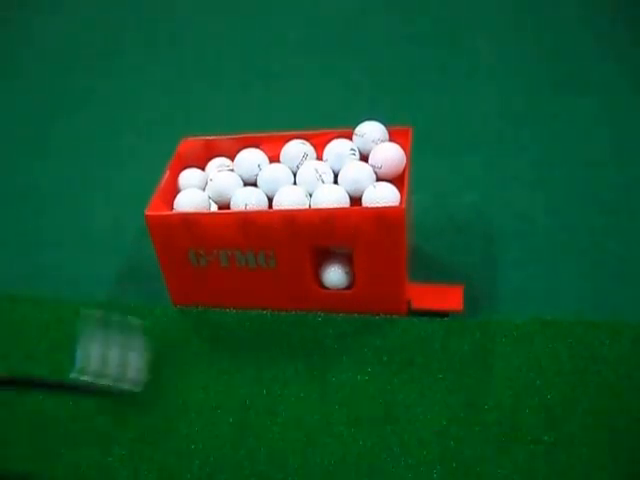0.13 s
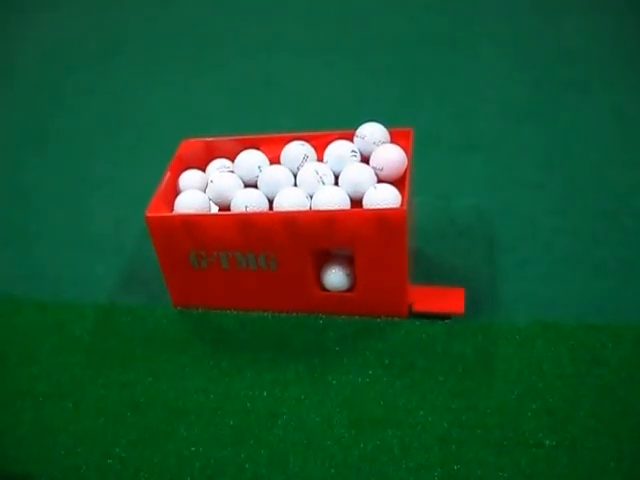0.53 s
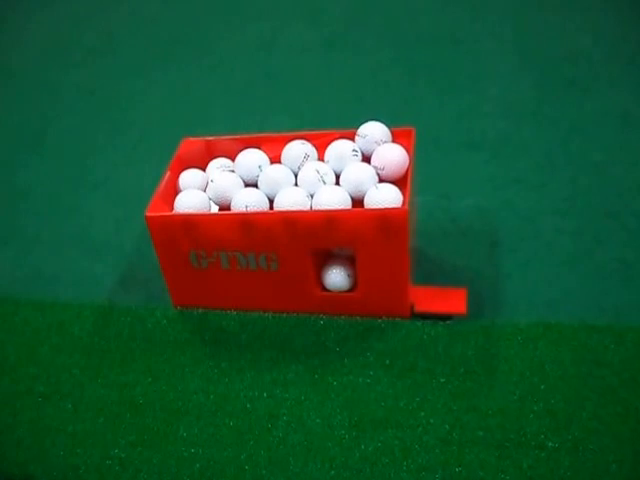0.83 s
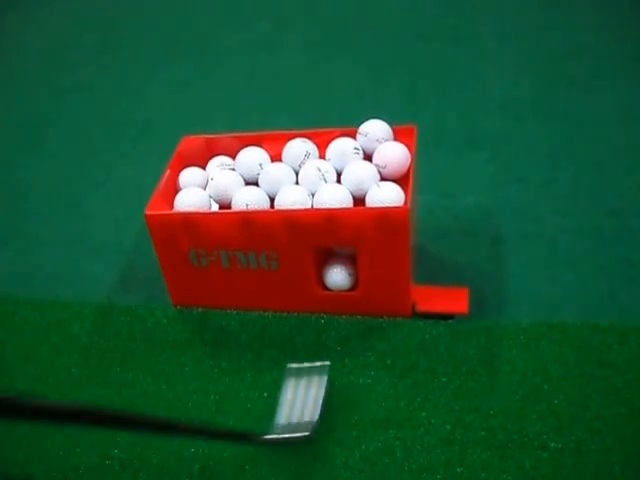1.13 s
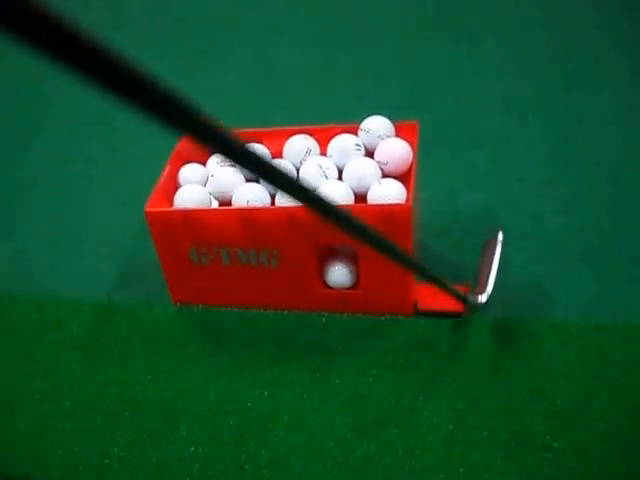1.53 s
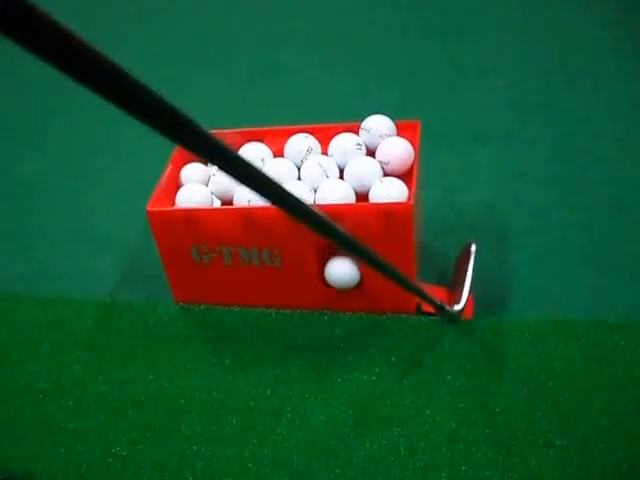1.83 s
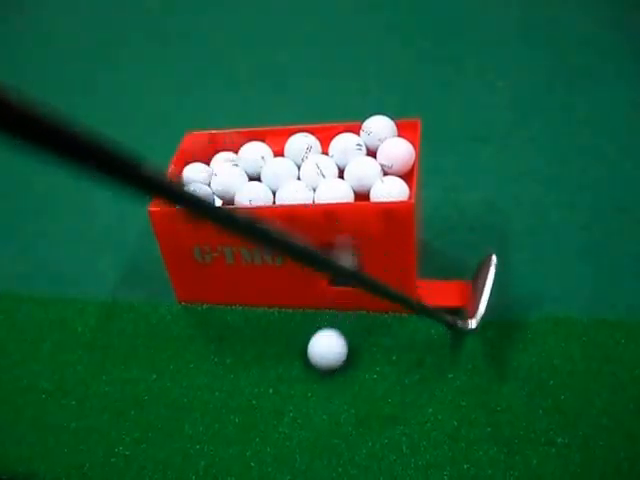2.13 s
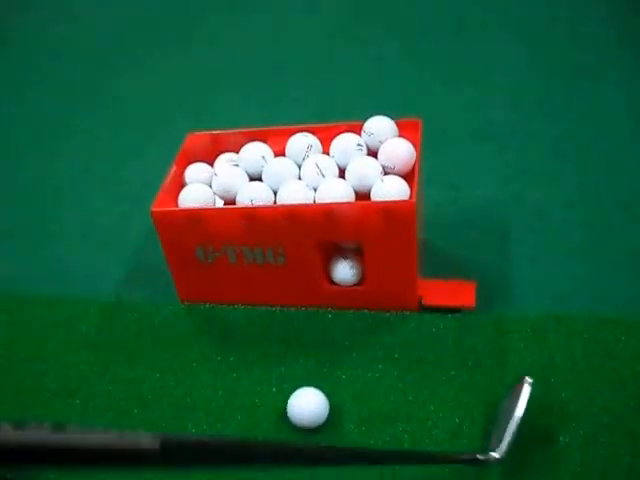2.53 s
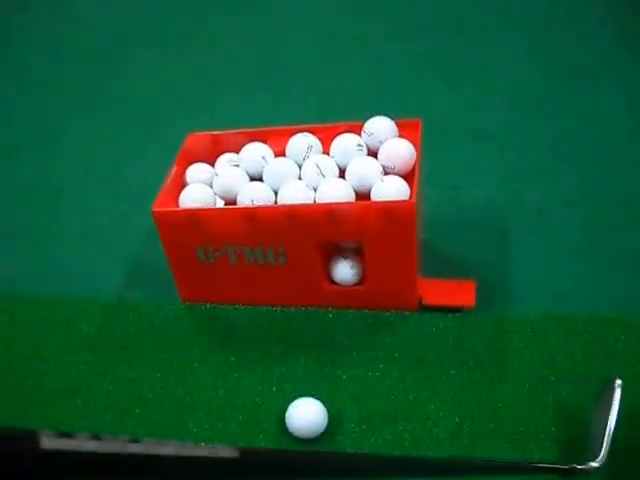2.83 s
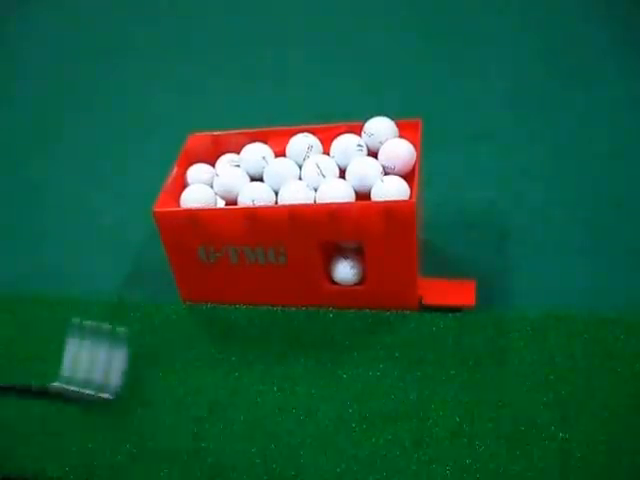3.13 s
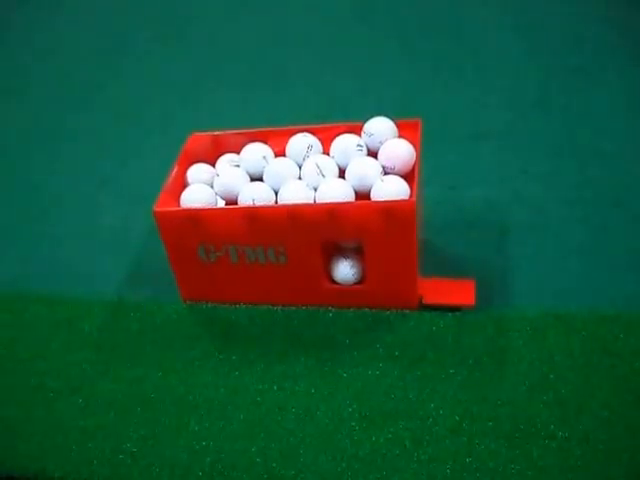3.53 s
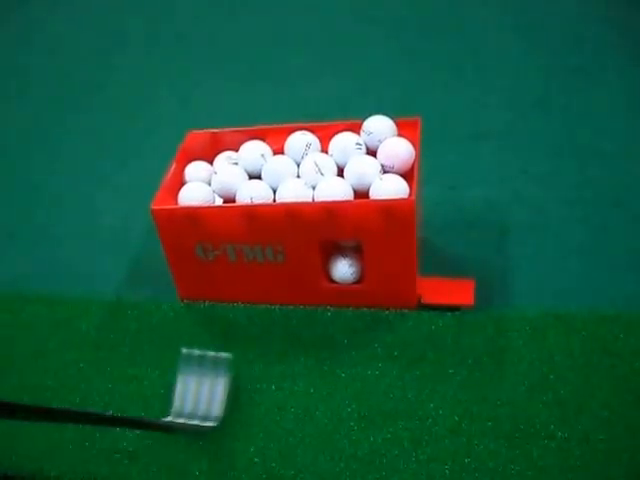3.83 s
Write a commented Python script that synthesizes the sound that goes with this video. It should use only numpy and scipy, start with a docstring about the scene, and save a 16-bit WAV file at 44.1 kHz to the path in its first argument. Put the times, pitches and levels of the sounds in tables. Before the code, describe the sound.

A golf club clicks against a ball right at the start; the ball thuds into a soft backstop and bounces on carpet until about 0.8 seconds. Soft scuffs follow around 1.5 seconds. A plastic ball dispenser clacks and rattles from 1.8 to 2.4 seconds. A second chip clicks at about 3 seconds, followed by a thud, bounces and a last scuff. Faint hum and hiss fill the room.

```python
"""Two short golf chips on a mat in a practice room, over faint hum and hiss. The iron clicks against the
ball, which thuds into a soft backstop, drops and bounces on the carpeted floor. Club and feet shift on
the mat. The club presses the pedal of a plastic dispenser: a ball drops out, the lever clacks back and
the balls in the bin settle. At three seconds comes the second chip, with its thud, its bounces and a
last scuff on the mat."""
import sys
import numpy as np
from scipy import signal
from scipy.fft import rfft, irfft
from scipy.io import wavfile
from scipy.ndimage import uniform_filter1d

SR = 44100
rng = np.random.default_rng(int(sys.argv[2]) if len(sys.argv) > 2 else 0)


def to_wav(s):
    """Save 16-bit WAV."""
    ch = np.atleast_2d(s).T  # columns
    pcm = np.round(np.clip(ch, -1, 1) * 32767)  # PCM
    wavfile.write(sys.argv[1], SR, pcm.astype(np.int16))


N = 176400
SIZE = 32768  # samples in one hit with its tail
T = np.arange(SIZE) / SR
HZ = np.fft.rfftfreq(SIZE, 1 / SR)


def amp(db):
    """Decibels to gain."""
    return 10 ** (np.asarray(db) / 20)


def along(points, hz):
    """Read a curve of (frequency [Hz], value) points on a log frequency axis."""
    freqs, values = np.transpose(points)
    return np.interp(np.log(hz + 1), np.log(freqs + 1), values)


def fade(t60, t=T):
    """Exponential decay, 60 dB down after t60 seconds."""
    return np.exp(-np.log(1000) * t / t60)


def dull(corner_hz, hz=HZ):
    """Gain in dB of a soft contact: little above the corner."""
    return -10 * np.log10(1 + (hz / corner_hz) ** 4)


def at_level(x, db):
    """Give a hit the energy of 10 ms of sound at this rms level."""
    return x / np.linalg.norm(x) * amp(db) * np.sqrt(SR / 100)


def add(track, s, x):
    """Mix a sound in at s seconds."""
    part = track[round(s * SR):][:len(x)]
    part += x[:len(part)]


def colour(x, gain_db):
    """Minimum-phase EQ: shapes the spectrum with no ringing ahead of the attack."""
    cepstrum = irfft(np.log(amp(gain_db)))
    cepstrum[1:SIZE // 2] *= 2
    cepstrum[SIZE // 2 + 1:] = 0
    impulse_response = irfft(np.exp(rfft(cepstrum)))
    return signal.fftconvolve(x, impulse_response)[:SIZE]


def flatten(x, smooth_hz=150):
    """Even out the broad spectrum of a noise burst and give it unit energy."""
    power = np.abs(uniform_filter1d(np.abs(rfft(x)) ** 2, int(smooth_hz / HZ[1])))
    x = colour(x, -10 * np.log10(power + 1e-12))
    return x / np.linalg.norm(x)


def contact(rattle_db, t60):
    """One sharp push followed by a brief random shudder."""
    burst = rng.standard_normal(SIZE) * fade(t60)
    burst *= amp(rattle_db) / np.linalg.norm(burst)
    burst[0] += 1
    return flatten(burst)


def ring(modes, scatter_db):
    """Damped modes of alternating polarity, excited a little differently by each hit."""
    out = np.zeros(SIZE)
    for k, (hz, db, t60) in enumerate(modes):
        gain = (-1) ** k * amp(db + scatter_db * rng.standard_normal())
        out += gain * fade(t60) * np.sin(2 * np.pi * hz * T)
    return out


def swell(hz, t60, rise_s):
    """One resonance that builds up and dies away."""
    return np.sin(2 * np.pi * hz * T) * fade(t60) * (1 - np.exp(-T / rise_s))


def in_room(x, wet_db, bass_db, linger):
    """Direct sound, a few wall echoes and a diffuse tail whose decay time is scaled by linger."""
    # reverb decay (frequency [Hz], t60 [s])
    room_t60 = [(80, 0.55), (250, 0.77), (600, 0.48), (1500, 1), (4000, 0.6), (10000, 0.67)]
    # wall echoes (delay [s], level [dB])
    walls = [(0.0116, -15), (0.0166, -14.5), (0.0235, -16.5), (0.03, -28)]
    predelay_s, build_s = 0.0026, 0.011
    hz, t, bands = signal.stft(rng.standard_normal(SIZE), SR, nperseg=256)
    bands *= fade(linger * along(room_t60, hz)[:, None], t)
    tail = signal.istft(bands, SR, nperseg=256)[1][:SIZE]
    tail *= np.clip((T - predelay_s) / build_s, 0, 1)
    shelf_db = along([(350, bass_db), (1200, 0.003)], HZ)
    response = colour(flatten(tail), wet_db + shelf_db)
    response[0] += 1  # direct sound
    for delay, db in walls:
        response[round(delay * SR)] += amp(db)
    return signal.fftconvolve(x, response)[:SIZE]


def room_tone():
    """The bed: steady hiss and rumble with a low machine hum."""
    # spectrum of the hiss and rumble (frequency [Hz], relative level [dB])
    air_eq = [(20, -29), (30, -5), (45, -9), (65, -9), (110, -16.5), (200, -22.5), (400, -25), (1000, -28),
              (2000, -32), (4000, -35), (8000, -37.5), (10200, -38.5), (11000, -50)]
    air_db, hum_db, hum_hz = -60, -59, 53.5
    air_gain = amp(along(air_eq, np.fft.rfftfreq(N, 1 / SR)))
    air = irfft(rfft(rng.standard_normal(N)) * air_gain, N)
    hum = np.sqrt(2) * np.sin(2 * np.pi * hum_hz * np.arange(N) / SR)
    return amp(air_db) * air / air.std() + amp(hum_db) * hum


def floor_boom(hz, db):
    """The floor gives under a blow: a hollow note a few cycles long, its pitch set by the spot."""
    note = at_level(swell(hz, t60=6.8 / hz, rise_s=0.5 / hz), db)
    return in_room(note, wet_db=-4.5, bass_db=1, linger=0.92)


def shuffles():
    """Club and feet shift on the mat in soft scuffs; the floor booms under each."""
    # scuffs (time [s], level [dB], dull above [Hz], t60 [s], boom level [dB], boom pitch [Hz])
    scuffs = [(1.221, -44.5, 332, 0.025, -46, 135), (1.246, -57, 1500, 0.097, -56, 130),
              (1.261, -48, 150, 0.046, -38.5, 122), (1.459, -38.5, 1480, 0.044, -37, 183),
              (1.468, -41, 2000, 0.023, -36, 238), (1.484, -36, 310, 0.072, -33.5, 105),
              (1.578, -48.5, 440, 0.034, -44.5, 323), (1.604, -53, 202, 0.043, -41.5, 110),
              (3.844, -39, 490, 0.17, -42.5, 113)]
    # tone of the mat (frequency [Hz], gain [dB])
    mat_eq = [(35, -15), (70, -9.5), (110, 6.5), (160, -6), (250, 0), (420, -3), (600, -10), (900, -8.5),
              (1150, -21), (1600, -43), (5000, -39)]
    attack = np.clip(T / 0.0022, 0, 1)
    out = np.zeros(N)
    for s, db, corner_hz, t60, boom_db, boom_hz in scuffs:
        push = rng.standard_normal(SIZE) * fade(t60) * attack
        scuff = at_level(colour(push, along(mat_eq, HZ) + dull(corner_hz)), db)
        add(out, s, in_room(scuff, wet_db=1, bass_db=-1, linger=0.65))
        add(out, s, floor_boom(boom_hz, boom_db))
    return out


def dispenser():
    """Lever and balls clack on the plastic, ring the lever briefly and set the hollow bin knocking."""
    # clacks (time [s], crack [dB], lever ring [dB], bin knock [dB],
    # crack tilt [dB/octave], knock tilt [dB/octave])
    clacks = [(1.7931, -45, -43.5, -52.5, -1, 12), (1.8429, -47.5, -51, -41.5, -4, -4),
              (1.882, -48, -71, -46.5, -8.5, -8), (1.908, -52, -66, -47.5, -7, -4.5),
              (2.0168, -38.5, -42, -44, 1, 0.5), (2.074, -51, -52, -57, -1, -13),
              (2.143, -52.5, -68, -49, -3, -5.5), (2.174, -32, -37, -33, 2, 2),
              (2.1773, -29.5, -43, -27, -7, -2), (2.2169, -40, -47.5, -31.5, -1, -4),
              (2.2344, -35.5, -42, -29, -0.5, 0), (2.259, -51, -47, -34, -2, 1),
              (2.273, -35.5, -49.5, -35, -7.5, 5), (2.317, -41.5, -52, -39.5, -5, -1),
              (2.348, -48.5, -63, -44.5, -0.5, -1.5)]
    # tone of the plastic crack (frequency [Hz], gain [dB])
    crack_eq = [(70, -12.5), (160, -3), (300, 3.5), (480, -13), (620, 6), (720, 4.5), (820, -0.5),
                (1150, 1), (1900, 1), (2600, -4), (3500, -2), (3900, -10), (4300, -10), (5000, -17),
                (5700, -16), (6200, -20.5), (8000, -24.5), (11000, -38.5)]
    # modes of the plastic lever (frequency [Hz], level [dB], t60 [s])
    lever_modes = [(627, -6.5, 0.12), (1286, -0.5, 0.041), (1624, -2.5, 0.076), (2125, 1, 0.012),
                   (2470, -2, 0.012), (3045, 1, 0.016), (3670, -18, 0.0064), (5840, -8.5, 0.0097)]
    # resonances of the bin (frequency [Hz], level [dB], t60 [s])
    bin_modes = [(233.2, -7, 0.19), (277, 1, 0.051), (332.7, -1, 0.064), (420, -7, 0.055),
                 (501, -10.5, 0.053), (596, -2.5, 0.058), (606, 4.5, 0.041), (759, -3, 0.095),
                 (839, 1, 0.04), (966, -14, 0.12), (1143, -23.5, 0.26), (1627, -20, 0.13),
                 (1870, -17.5, 0.081), (2120, -15.5, 0.071)]
    # low cut: the small bin radiates little bass (frequency [Hz], gain [dB])
    low_cut = [(60, -38.5), (140, -10.5), (220, -16)]
    low_cut_db = along(low_cut, HZ)
    out = np.zeros(N)
    for s, crack_db, lever_db, knock_db, crack_tilt, knock_tilt in clacks:
        bright_db = crack_tilt * np.log2(np.clip(HZ, 500, 9000) / 2000)
        hollow_db = knock_tilt * np.log2(np.clip(HZ, 200, 1000) / 450)
        crack = colour(contact(rattle_db=10.5, t60=0.036), along(crack_eq, HZ) + bright_db)
        lever = colour(ring(lever_modes, scatter_db=1.5), low_cut_db)
        knock = colour(ring(bin_modes, scatter_db=3.5), low_cut_db + hollow_db)
        clack = at_level(crack, crack_db) + at_level(lever, lever_db) + at_level(knock, knock_db)
        add(out, s, in_room(clack, wet_db=-2.5, bass_db=0, linger=0.85))
    return out


def bounces():
    """The ball lands and bounces on the carpet; the floor booms and the room returns low echoes."""
    # landings (time [s], thud level [dB], dull above [Hz], boom level [dB], boom pitch [Hz])
    landings = [(0.449, -31, 750, -30.5, 218), (0.58, -44, 900, -43, 304), (0.589, -36, 750, -31.5, 108),
                (0.678, -41.5, 600, -41.5, 289), (0.692, -47.5, 200, -44, 110),
                (0.821, -47, 256, -41.5, 114), (2.017, -54, 90, -46, 87.5), (3.435, -29, 1200, -30.5, 228),
                (3.576, -41.5, 1080, -45.5, 273), (3.587, -42, 800, -33, 108.4),
                (3.658, -44, 600, -46.5, 292), (3.802, -56, 150, -42, 105.6)]
    # tone of a thud on carpet (frequency [Hz], gain [dB])
    carpet_eq = [(35, -27.5), (70, 9), (110, 3.5), (160, -7.5), (230, 3.5), (400, -1.5), (750, -7.5),
                 (1050, -17), (1600, -31.5), (5000, -51)]
    # pitched echoes of a thud (delay [s], level against the thud before dulling [dB], pitch [Hz])
    low_echoes = [(0.017, -4.5, 133), (0.029, -11, 591), (0.055, -5.5, 222), (0.092, -23, 528)]
    out = np.zeros(N)
    for s, thud_db, corner_hz, boom_db, boom_hz in landings:
        thud = colour(contact(rattle_db=7, t60=0.058), along(carpet_eq, HZ) + dull(corner_hz))
        add(out, s, in_room(at_level(thud, thud_db), wet_db=1.5, bass_db=-1.5, linger=1.0))
        add(out, s, floor_boom(boom_hz, boom_db))
        for delay, db, hz in low_echoes:
            echo = swell(hz, t60=0.047, rise_s=0.0077)
            add(out, s + delay, at_level(echo, thud_db + db + dull(corner_hz, hz)))
    return out


def backstop():
    """The soft backstop catches each flying ball with one thud."""
    # catches (time [s], level [dB])
    catches = [(0.2734, -33), (3.2690, -30)]
    # tone of the backstop (frequency [Hz], gain [dB])
    backstop_eq = [(40, -12), (110, 1.5), (240, 2), (500, -6), (780, -0.5), (1000, -14.5), (1300, -27.5),
                   (2200, -33.5), (3500, -48), (6000, -85)]
    out = np.zeros(N)
    for s, db in catches:
        thud = colour(contact(rattle_db=-7, t60=0.017), along(backstop_eq, HZ))
        add(out, s, in_room(at_level(thud, db), wet_db=1, bass_db=-1, linger=0.61))
    return out


def club():
    """The iron meets the ball: a bright tick, a woody click and a short ring of the head."""
    # strokes (time [s], click [dB], head ring [dB], tick [dB])
    chips = [(0.0708, -36, -75, -42.5), (3.0595, -36.5, -34, -45)]
    # tone of the first touch (frequency [Hz], gain [dB])
    tick_eq = [(300, -44), (2700, -3), (3500, -8), (3950, 3.5), (4450, -1.5), (4850, -15), (5400, -2),
               (6400, -13.5), (7100, -10.5), (7800, -12), (8400, -9.5), (10000, -15.5), (11000, -28)]
    # tone of the woody click (frequency [Hz], gain [dB])
    click_eq = [(60, -7), (170, 0.5), (330, -2.5), (550, -4), (850, 3.5), (1200, 5.5), (1750, -0.5),
                (2300, -12), (2900, -10), (3600, -19), (6000, -58), (11000, -69)]
    # modes of the club head (frequency [Hz], level [dB], t60 [s])
    head_modes = [(1790, -6, 0.0082), (2310, -5.5, 0.0095), (3032, -9.5, 0.011), (4270, -3.5, 0.016),
                  (4540, -2, 0.0078), (4940, -5, 0.0077), (6330, -10.5, 0.015), (6700, -13.5, 0.011),
                  (8160, -16.5, 0.012), (9250, -13, 0.0036)]
    squash_s = 0.0008  # the ball squashes just after the first tick of contact
    out = np.zeros(N)
    for s, click_db, ring_db, tick_db in chips:
        tick = at_level(colour(contact(rattle_db=10, t60=0.0094), along(tick_eq, HZ)), tick_db)
        click = at_level(colour(contact(rattle_db=3, t60=0.019), along(click_eq, HZ)), click_db)
        head = at_level(ring(head_modes, scatter_db=1.5), ring_db)
        add(out, s, in_room(tick, wet_db=-6, bass_db=-4.5, linger=1.0))
        add(out, s + squash_s, in_room(click, wet_db=-2, bass_db=-6, linger=0.9))
        add(out, s + squash_s, in_room(head, wet_db=-5.5, bass_db=3, linger=0.94))
    return out


def scene():
    """All layers in one mono mix."""
    return (club() + backstop() + bounces() + shuffles() + dispenser() + room_tone())[None]


def record(dry):
    """A steep low-pass takes off the top treble."""
    top_hz = 11100
    taps = signal.firwin(161, top_hz, fs=SR, window=("kaiser", 7))
    return signal.fftconvolve(dry, taps[None], mode="same", axes=1)


dry = scene()
out = record(dry)
to_wav(out)
```